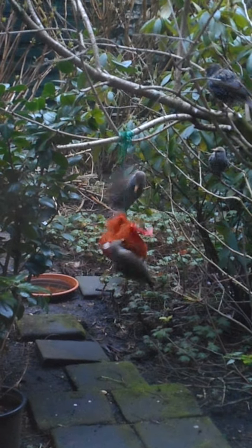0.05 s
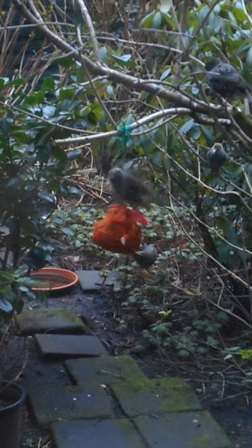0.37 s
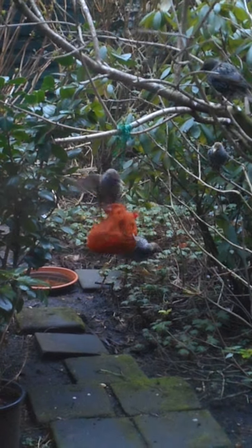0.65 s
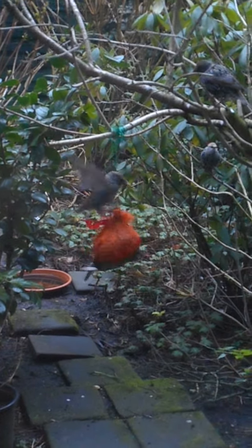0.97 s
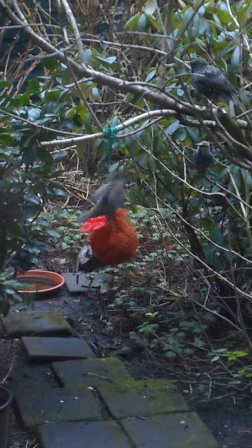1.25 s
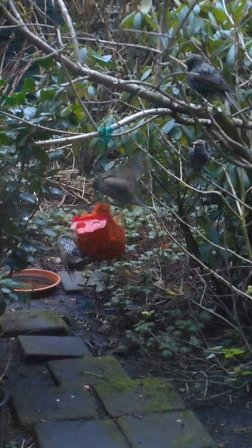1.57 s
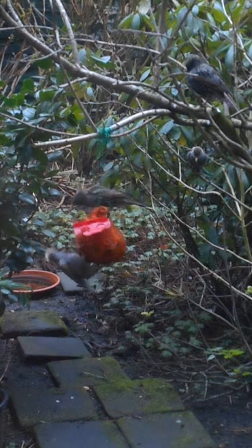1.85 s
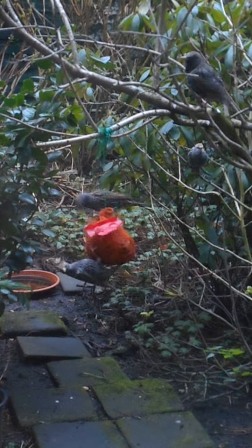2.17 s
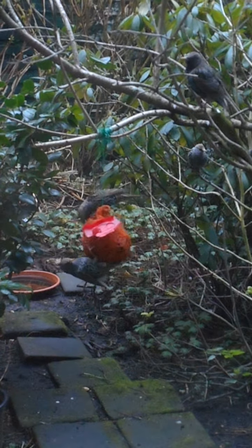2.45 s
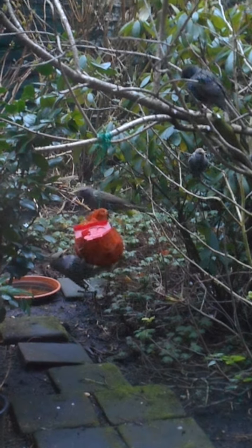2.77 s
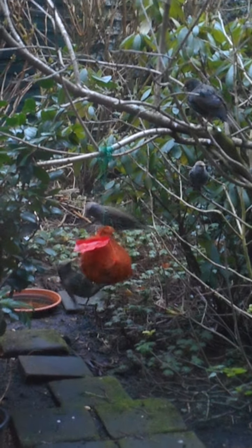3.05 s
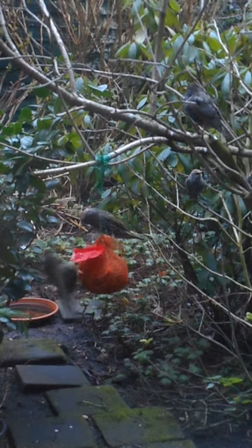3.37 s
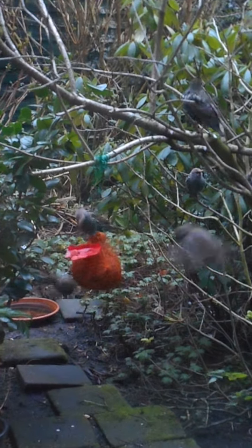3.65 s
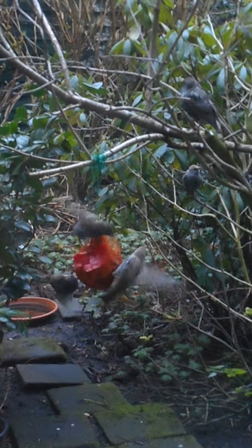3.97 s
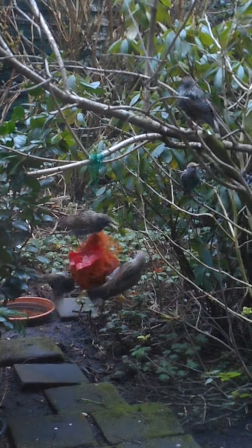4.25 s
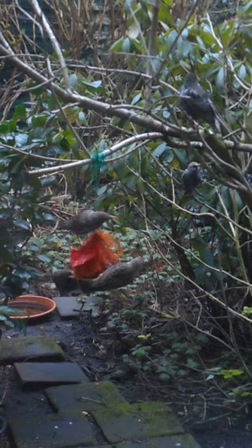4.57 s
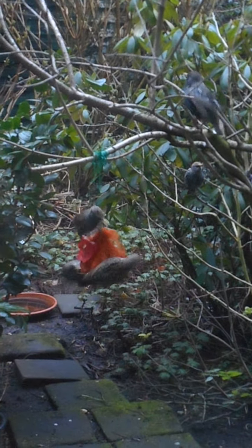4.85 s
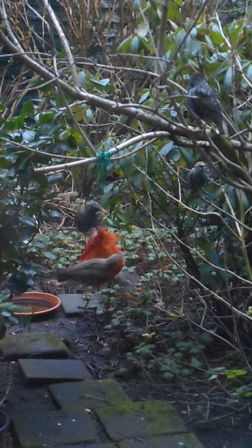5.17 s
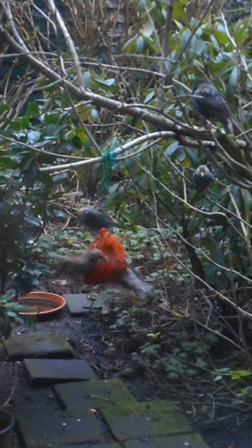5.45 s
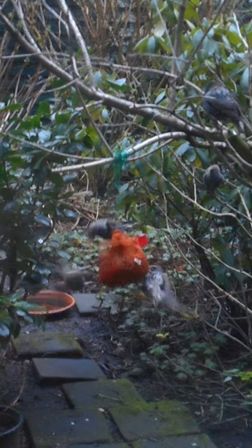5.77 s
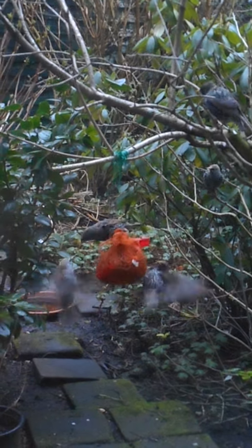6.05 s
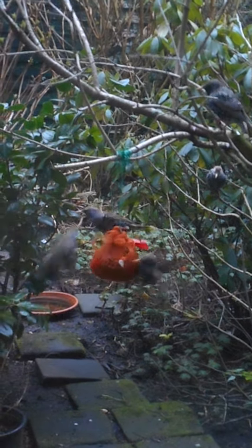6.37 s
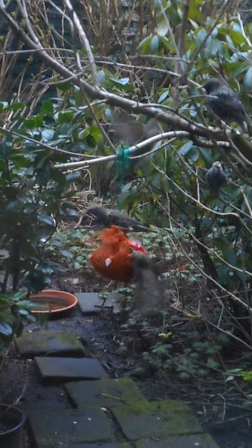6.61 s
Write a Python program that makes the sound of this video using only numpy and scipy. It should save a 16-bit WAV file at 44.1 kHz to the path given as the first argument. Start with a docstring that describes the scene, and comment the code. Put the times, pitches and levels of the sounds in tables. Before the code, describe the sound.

Thin falling bird whistles and wing flurries over soft outdoor hiss, with sharp plastic handling clicks and rubs very close by.

```python
"""A quiet garden hisses softly while starlings squabble at a hanging feeder some metres off: thin falling
whistles and small chirps echo off bushes and a wall, among faint rasps. From about 3 s a hard plastic
shell right at the microphone ticks loudly and is brushed; each tick is a tiny slip that makes it ring.
Wings whirr up in a flurry near 4 s, and more ticks, soft bumps and calls follow.
Near 6.6 s the wings flurry again and the shell gives a faint creak."""
import sys
import numpy as np
from scipy import signal
from scipy.fft import rfft, irfft
from scipy.io import wavfile
from scipy.ndimage import uniform_filter1d

SR = 44100
rng = np.random.default_rng(int(sys.argv[2]) if len(sys.argv) > 2 else 0)


def inscribe(sig):
    """Save sig as 16-bit PCM at rate SR to the path in sys.argv[1].

    A 1-D sig is mono; a 2-D sig holds one channel per row.
    Samples are clipped to [-1, 1] before scaling.
    """
    pcm = np.round(np.clip(np.atleast_2d(sig).T, -1, 1) * 32767)
    wavfile.write(sys.argv[1], SR, pcm.astype(np.int16))


N = 300762


def amp(db):
    """Turns decibels into a number to multiply a sound by."""
    return 10 ** (np.asarray(db) / 20)


def evened(x):
    """Scales a sound so that its average strength (rms) is 1."""
    return x / np.sqrt(np.mean(x ** 2) + 1e-20)


def add(mix, s, sound):
    """Lays a sound into the mix, starting at s seconds."""
    at = round(s * SR)
    sound = sound[max(-at, 0):]
    part = mix[max(at, 0):][:len(sound)]
    part += sound[:len(part)]


def noise(size, colour, tilt_db=0):
    """Noise shaped by (pitch [Hz], level [dB]) points, tilted by tilt_db per octave above 1000 Hz."""
    hz = np.fft.rfftfreq(size, 1 / SR)
    point_hz, point_db = np.transpose(colour)
    colour_db = np.interp(np.log(hz + 1), np.log(point_hz + 1), point_db)
    octaves = np.log2(np.maximum(hz / 1000, 1))
    return evened(irfft(rfft(rng.standard_normal(size)) * amp(colour_db + tilt_db * octaves), size))


def band(size, centre_hz, width_hz, order=2):
    """Noise around one pitch, or a random wobble if that is 0 Hz; a higher order has steeper sides."""
    hz = np.fft.rfftfreq(size, 1 / SR)
    distance = abs(hz - centre_hz) / (width_hz / np.sqrt(2))
    return evened(irfft(rfft(rng.standard_normal(size)) / (1 + distance ** order), size))


def swell(start, top, end, peaked):
    """A rounded rise and fall that is 1 at its top."""
    t = np.arange(start, max(end, start + .01), 1 / SR)
    return np.sin(np.pi / 2 * np.interp(t, [start, top, end], [0, 1, 0])) ** peaked


def puffs(rows):
    """One short swell of noise around one pitch for each row."""
    out = np.zeros(N)
    for start, top, end, db, hz, width_hz in rows:
        shape = swell(start, top, end, peaked=1.3)
        add(out, start, amp(db) * shape * band(len(shape), hz, width_hz, order=4))
    return out


def air(hiss_db=-61.5, flicker_db=0.43):
    """An even hiss, with a few narrow humming bands that swell and fade."""
    # the tone of the hiss: (pitch [Hz], relative level [dB])
    hiss_colour = [(15, -61), (25, -26.5), (87, -12.5), (218, -12.5), (288, -10.5), (336, -9), (422, -9.5),
                   (703, -7.5), (1170, -7.5), (1300, -7), (2710, -7.5), (3240, -9), (6780, -12.5),
                   (8750, -18), (11000, -31), (14300, -71), (22000, -120)]
    # the humming bands: (pitch [Hz], width [Hz], level before the swell [dB])
    hum_bands = [(1178, 75, -67), (1025, 120, -78), (2735, 90, -78.5)]
    # how the hum swells: (time [s], level change [dB])
    hum_swell = [(0, -4), (.26, 5.5), (.45, 0.5), (.76, 2), (.84, -3), (1.1, -12.5), (1.18, 1.5), (3.4, 1),
                 (5.6, 6.5), (6.82, -6)]
    hiss = amp(hiss_db + flicker_db * band(N, 0, 34)) * noise(N, hiss_colour)
    hum = sum(amp(db) * band(N, hz, width_hz) for hz, width_hz, db in hum_bands)
    return hiss + hum * amp(np.interp(np.arange(N) / SR, *np.transpose(hum_swell)))


def wing_effort(rise_db_per_s=149, tire_db_per_s=16, stop_db_per_s=96.5, rest_db=-82.5):
    """How hard the wings work: each burst starts quickly, tires while it lasts, and stops."""
    # bursts of flapping: (time of full effort [s], length [s], level [dB])
    bursts = [(.08, .08, -70.5), (.75, .03, -69.5), (1.45, 0.043, -64.5), (2.597, .15, -69.5),
              (2.846, 0.071, -69), (3.352, 0.032, -64.5), (3.756, .17, -56.5), (3.95, 0.13, -53),
              (4.17, .2, -59.5), (4.42, 0.32, -65), (5.282, 0.51, -64.5), (6.445, 0.13, -57.5),
              (6.612, .25, -52.5)]
    t, power = np.arange(N) / SR, amp(rest_db) ** 2
    for s, length, db in bursts:
        rise = rise_db_per_s * np.minimum(t - s, 0)
        fall = tire_db_per_s * np.maximum(t - s, 0) + stop_db_per_s * np.maximum(t - s - length, 0)
        power = power + amp(db + rise - fall) ** 2
    return np.sqrt(power)


def wings(beat_hz=15, beat_db=1.0, drift=0.1564, whirr_hz=458, whirr_width_hz=60, whirr=0.54):
    """A low whirr of feathers, half rush and half note, that throbs with uneven wingbeats."""
    # the tone of rushing feathers: (pitch [Hz], relative level [dB])
    feather_colour = [(60, -30), (250, -27.5), (370, -9), (455, -4.5), (540, -8), (700, -14.5),
                      (1200, -22.5), (2500, -19.5), (6000, -43)]
    beats = np.cumsum(beat_hz * (1 + drift * band(N, 0, 3.9))) / SR
    feathers = noise(N, feather_colour) + whirr * band(N, whirr_hz, whirr_width_hz)
    return wing_effort() * evened(feathers * amp(beat_db * np.sin(2 * np.pi * beats)))


def rasps():
    """A hoarse throat gives a breath of noise with no clear note."""
    # hoarse calls: (start [s], loudest moment [s], end [s], level [dB], pitch [Hz], width [Hz])
    calls = [(-.03, .04, 0.17, -62, 2270, 900), (1.19, 1.26, 1.48, -61.5, 2530, 1290),
             (1.29, 1.395, 1.52, -57.5, 2230, 800), (2.0, 2.08, 2.2, -62.5, 2360, 650),
             (3.86, 3.95, 3.95, -57.5, 2300, 1800), (5.14, 5.36, 5.65, -55.5, 2190, 970),
             (5.19, 5.3, 5.54, -63.5, 5750, 353), (6.52, 6.72, 6.94, -56, 2380, 1501)]
    return puffs(calls)


def voice(hz, db, hoarse, tremble_hz, flutter_db, flutter_hz=40):
    """A bird's gliding tone that flutters in strength; hoarse is the share by which its pitch trembles."""
    pitch = hz * (1 + hoarse * band(len(hz), tremble_hz, tremble_hz))
    tone = np.sqrt(2) * np.sin(2 * np.pi * np.cumsum(pitch) / SR)
    db = db + flutter_db * band(len(hz), flutter_hz, flutter_hz)
    return tone * amp(db) * signal.windows.tukey(len(hz), .12)


def chirps(scoop_from=.7, scoop_hoarse=.095, note_hoarse=0.018, clearing_s=0.0096, fade_db=3):
    """Each chirp scoops up hoarsely, then clears into a short note that bends and fades a little."""
    # chirps: (start [s], scoop length [s], note length [s], note pitch [Hz], end pitch [Hz],
    # relative note level [dB], relative scoop level [dB])
    calls = [(.015, 0.055, 0.035, 3250, 3400, -54.5, -62.5), (.495, 0.043, 0.017, 3034, 3100, -56, -55),
             (.53, 0.029, .018, 4900, 5000, -60, -63), (.565, 0.023, .025, 3890, 3830, -59.5, -62),
             (1.0, 0.047, 0.092, 4160, 4250, -67.5, -66), (1.22, .06, .028, 3910, 3700, -61, -63),
             (1.765, .012, 0.027, 2210, 2360, -58.5, -67), (1.80, .053, 0.037, 3870, 3430, -61, -65),
             (2.812, .02, .018, 3310, 3300, -48.5, -64), (3.91, .075, 0.0323, 3850, 3810, -60.5, -63),
             (4.86, 0.077, .026, 3560, 3470, -52, -59), (5.385, 0.0094, 0.027, 3400, 3280, -58, -63),
             (5.715, 0.016, .028, 5760, 5460, -45, -50)]
    out = np.zeros(N)
    for start, scoop_s, note_s, note_hz, end_hz, note_db, scoop_db in calls:
        t = np.arange(-scoop_s, note_s, 1 / SR)  # zero where the note lands
        hz = np.interp(t, [-scoop_s, 0, note_s], [scoop_from * note_hz, note_hz, end_hz])
        hoarse = np.interp(t, [-clearing_s, 0], [scoop_hoarse, note_hoarse])
        db = np.interp(t, [-clearing_s, 0, note_s], [scoop_db, note_db, note_db - fade_db])
        add(out, start, voice(hz, db, hoarse, tremble_hz=150, flutter_db=2.5))
    return out


def whistles(sag_hz_per_s=8000, drop_s=.07, steps_per_s=34, stall=.95, low_hoarse=.036):
    """Each whistle starts thin and high, sags, then breaks and drops in steps; most grow hoarser."""
    # whistles: (start [s], length [s], time until the voice breaks [s], top pitch [Hz], end pitch [Hz],
    # relative level [dB], level change along the call [dB], starting hoarseness [share of pitch])
    calls = [(0.255, 0.26, .045, 9510, 4200, -57.5, 5, .006),
             (0.629, .13, 0.027, 8490, 6950, -56, 1, 0.0087),
             (1.304, .24, .02, 8700, 6040, -58, 16, 0.0074),
             (3.513, 0.24, 0.08, 8980, 4670, -60.5, -5, .004),
             (4.008, .095, .06, 8400, 7500, -52.5, -2, .006), (5.602, .145, 0.099, 8490, 6730, -57, 1, .05)]
    out = np.zeros(N)
    for start, length, break_s, top_hz, end_hz, db, change_db, first_hoarse in calls:
        t = np.arange(0, length, 1 / SR)
        sagging = top_hz - sag_hz_per_s * t
        turn = 2 * np.pi * steps_per_s * np.maximum(t - break_s, 0)
        falling_s = (turn + stall * np.sin(turn)) / (2 * np.pi * steps_per_s)  # almost halts each step
        drop = 1 - np.exp(-falling_s / drop_s)
        hz = sagging + (end_hz - sagging[-1]) * drop / (drop[-1] + 1e-9)
        octaves_fallen = np.log2(top_hz / hz)
        hoarse = np.interp(octaves_fallen, [0, 0.44], [first_hoarse, low_hoarse])
        level_db = db + change_db * (t / length - .5)
        add(out, start, voice(hz, level_db, hoarse, tremble_hz=170, flutter_db=3.5))
    return out


def garden(x, bushes_db=-1, tail_s=0.26, echoes_per_s=2000, wall_s=.028, wall_db=-9):
    """Bushes scatter a short tail of tiny echoes, and a wall gives one clearer echo."""
    t = np.arange(SR // 2) / SR
    echoes = rng.choice([-1., 1.], len(t)) * (rng.random(len(t)) < echoes_per_s / SR)
    tail = echoes * (t > .002) * amp(-60 * t / tail_s)
    response = amp(bushes_db) * tail / np.linalg.norm(tail)
    response[0] = 1  # the sound that arrives straight
    add(response, wall_s, amp([wall_db]))
    return signal.fftconvolve(x, response / np.linalg.norm(response))[:N]


def bumps():
    """Handling the shell makes soft, low bumps."""
    # bumps: (start [s], loudest moment [s], end [s], level [dB], pitch [Hz], width [Hz])
    nudges = [(4.672, 4.70, 4.77, -57, 181, 258), (4.91, 4.95, 5.1, -70.5, 297, 150),
              (5.44, 5.51, 5.58, -72.5, 250, 300), (6.35, 6.39, 6.5, -66.5, 235, 220)]
    return puffs(nudges)


def brushes(rise_share=.41, grain_db=1.5, grain_hz=300, catch_db=-0.5, catch_hz=50):
    """Each stroke over the shell presses harder, then eases, catching unevenly with a fine grain."""
    # strokes: (loudest moment [s], length [s], level [dB], brightness [dB per octave])
    strokes = [(3.127, 0.096, -44, -5), (3.193, 0.079, -47, -6.5), (3.296, 0.16, -59.5, -1),
               (4.661, 0.088, -48, 4), (4.744, 0.086, -46.5, -0.5), (5.508, 0.073, -58.5, 6),
               (5.66, .135, -47, -0.5), (5.756, 0.14, -53, 0.5), (5.891, 0.054, -42.5, 2),
               (5.92, .06, -40.5, 1.5), (5.963, 0.097, -41, 1), (6.035, 0.088, -50.5, -2),
               (6.102, 0.057, -51, -2.5), (6.358, .055, -40, 0), (6.393, 0.098, -47.5, -0.5),
               (6.792, .25, -60, -2)]
    # the tone of brushed plastic: (pitch [Hz], relative level [dB])
    brush_colour = [(20, -61), (150, -37), (600, -13), (1100, -3.5), (1900, -1), (2700, 5), (4100, 0),
                    (6000, 2.5), (7500, -2.5), (9700, -8), (11000, -30)]
    out = np.zeros(N)
    for top, length, db, tilt_db in strokes:
        start = top - rise_share * length
        shape = swell(start, top, start + length, peaked=1.2)
        grains = amp(grain_db * band(len(shape), 0, grain_hz) + catch_db * band(len(shape), 0, catch_hz))
        add(out, start, amp(db) * shape * evened(grains * noise(len(shape), brush_colour, tilt_db)))
    return out


def shell_ring(t, detune=0.028, scatter=0.27, scatter_s=0.003, thin_hz=700, leak=0.08):
    """The plastic shell rings at its own pitches; nearby surfaces scatter the sound for a moment."""
    # the shell's own notes: (pitch [Hz], relative level [dB], time to fade by 60 dB [s])
    notes = [(650, -15.5, 0.019), (1110, -7.5, 0.012), (1595, -11.5, 0.014), (1905, -6.5, 0.011),
             (2370, -2.5, 0.015), (2708, -1.5, 0.017), (3100, -4, 0.011), (3584, -1, 0.0081),
             (4280, -0.5, 0.0062), (5190, 3.5, 0.0039), (6010, 5, 0.0065), (6480, -4.5, 0.0055),
             (8800, 8.5, 0.0042), (8900, -30, 0.0035)]
    shifts = 1 + detune * rng.standard_normal(len(notes))  # the pitches shift with the grip
    ring = sum(amp(db - 60 * t / fade_s) * np.cos(2 * np.pi * hz * shift * t)
               for shift, (hz, db, fade_s) in zip(shifts, notes))
    echoes = rng.standard_normal(len(t)) * np.exp(-t / scatter_s)
    ring = evened(ring) + scatter * evened(echoes)
    bass_cut = signal.butter(2, thin_hz, "high", fs=SR)  # a small shell gives off little bass
    return signal.lfilter(*bass_cut, ring) + leak * ring


def colour_tick(spectrum, level_db, tilt_db, spread_db, pivot_hz=3100):
    """Gives one tick its own loudness and tone by turning five pitch bands up or down."""
    # borders of the thud, knock, body, snap and fizz bands: (pitch [Hz])
    edges = [300, 800, 2000, 4000, 7800, 11000]
    # what a plain tick puts in each band: (relative level [dB])
    shares_db = [-26.5, -11.5, -5.5, -2, -14.5]
    edges, size = np.array(edges), len(spectrum) - 1
    hz = np.fft.rfftfreq(2 * size, 1 / SR)
    octaves = np.log2((edges[:-1] + edges[1:]) / 2 / pivot_hz)
    colour_db = np.array(shares_db) + tilt_db * octaves + spread_db * octaves ** 2
    wanted_db = level_db + colour_db - 20 * np.log10(np.linalg.norm(amp(colour_db)))
    energy = [np.sum(abs(spectrum[(hz > lo) & (hz < hi)]) ** 2) for lo, hi in zip(edges, edges[1:])]
    power = np.array(energy) / size / (SR / 100)  # spread over 10 ms
    change_db = wanted_db - 10 * np.log10(power)
    smooth_db = uniform_filter1d(change_db[np.digitize(hz, edges[1:-1])], size=60)
    log_gain = np.log(amp(np.r_[smooth_db, smooth_db[-2:0:-1]]))
    tone_filter = np.exp(np.conj(signal.hilbert(log_gain)))[:len(hz)]  # never sounds ahead of the slip
    return irfft(spectrum * tone_filter)[:size]


def tick(level_db, tilt_db, spread_db, grit=.36):
    """A sudden slip and its brief grating set the shell ringing."""
    t = np.arange(2048) / SR
    slip_ms = np.interp(level_db, [-27.5, -14], [0.54, 0.67])  # harder ticks slip for longer
    grating = rng.standard_normal(len(t)) * np.exp(-(1000 * t / slip_ms) ** 2)
    push = (t == 0) + grit * grating
    spectrum = rfft(push, 2 * len(t)) * rfft(shell_ring(t), 2 * len(t))
    return colour_tick(spectrum, level_db, tilt_db, spread_db)


def creak(start_s=6.6735, end_s=6.815, slips_per_s=62, uneven=.3, level_db=-49, vary_db=1.7):
    """The shell creaks in a run of faint, dull, unevenly spaced slips."""
    out, s = np.zeros(N), start_s
    for late, strong, bright in rng.standard_normal((30, 3)):
        if s < end_s:
            add(out, s, tick(level_db + vary_db * strong, tilt_db=bright - 4, spread_db=-0.1))
        s += np.exp(uneven * late) / slips_per_s
    return out


def ticks():
    """The shell slips now and then with a dry tick; one tick leaves a longer ring behind."""
    # slips: (time [s], level over 10 ms [dB], brightness [dB per octave],
    # lift of both bass and fizz [dB per octave squared])
    slips = [(0.6741, -43.5, 1.1, 1.8), (2.9139, -40.5, 0.5, 0), (2.9296, -37.5, 1.5, 0),
             (3.1089, -26.5, -1, -1.9), (3.193, -19, -0.45, 0), (3.2456, -48.5, -5.5, -2.5),
             (3.5517, -24.5, -2.3, -0.43), (3.5531, -24, 4.5, 1.7), (3.7056, -16.5, .5, 1),
             (3.7886, -35, -10, -2.5), (3.8052, -29.5, 5.5, 0), (4.2209, -29, 0.4, 0.5),
             (4.6827, -15.5, 1.6, 1.7), (4.7041, -17, 1.5, 1.6), (4.721, -32, -1, 2),
             (4.7469, -24.5, -5, -0.7), (4.7614, -19.5, 0.7, -2.5), (5.4367, -43, 0.7, -1.8),
             (5.8465, -21.5, 3, 1), (5.9401, -33, -1.5, -2.5), (5.9415, -24, 0, -2.5), (6.0468, -48, -6, 1),
             (6.1784, -40, 2, -2.5), (6.3074, -37.5, 1.5, -2.5), (6.3666, -39.5, -2.5, -1.1),
             (6.7847, -46.5, 3, -2)]
    # the longer ring: (time [s], pitch [Hz], level [dB], time to fade by 60 dB [s])
    long_ring = [(3.553, 1590, -49, .14), (3.553, 3170, -44, .13)]
    out, t = np.zeros(N), np.arange(SR // 5) / SR
    for s, level_db, tilt_db, spread_db in slips:
        add(out, s, tick(level_db, tilt_db, spread_db))
    for s, hz, db, fade_s in long_ring:
        add(out, s, amp(db - 60 * t / fade_s) * np.sin(2 * np.pi * hz * t))
    return out


def scene():
    """Birds out in the garden, the shell close by, hiss under both."""
    shell = ticks() + brushes() + creak() + bumps()
    birds = amp(-2.0) * whistles() + amp(-1.0) * chirps()
    return (shell + garden(birds) + rasps() + wings() + air())[None]


def record(dry, ceiling=.8, top_hz=10500):
    """The loudest ticks overload a little, adding crackle but no bass; the highest treble is cut off."""
    overload = dry / (1 + (dry / ceiling) ** 8) ** (1 / 8) - dry
    crackle = signal.lfilter(*signal.butter(1, 900, "high", fs=SR), overload)
    treble_cut = signal.firwin(101, top_hz, window=("kaiser", 7), fs=SR)
    return signal.oaconvolve(dry + crackle, treble_cut[None], "same")


dry = scene()
out = record(dry)
inscribe(out)
```